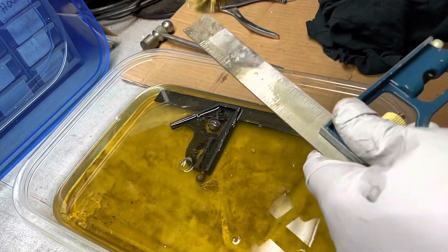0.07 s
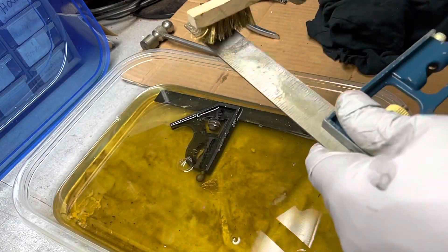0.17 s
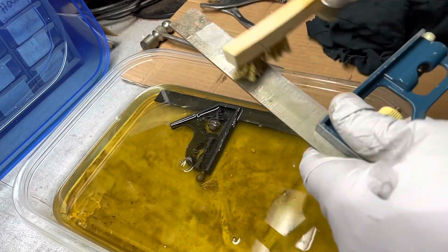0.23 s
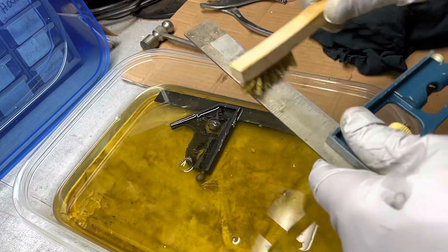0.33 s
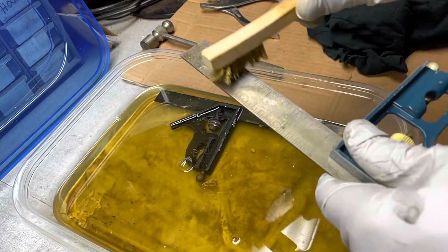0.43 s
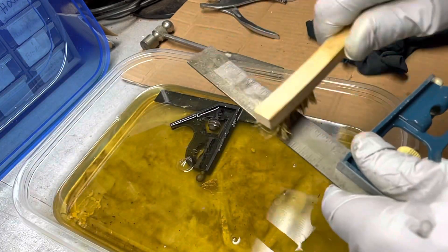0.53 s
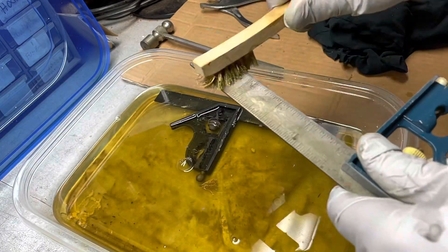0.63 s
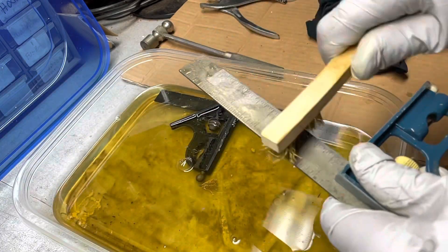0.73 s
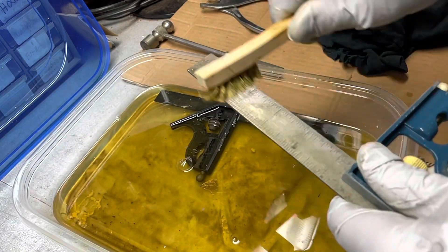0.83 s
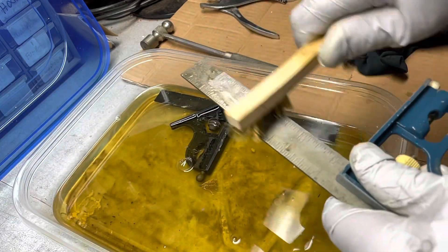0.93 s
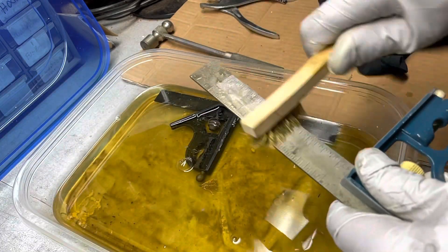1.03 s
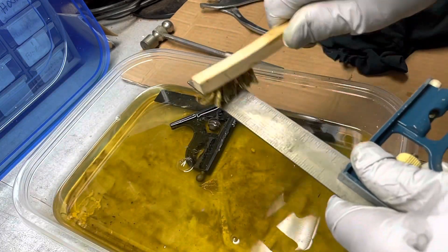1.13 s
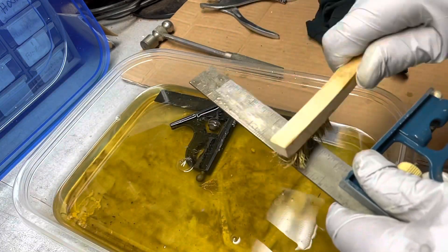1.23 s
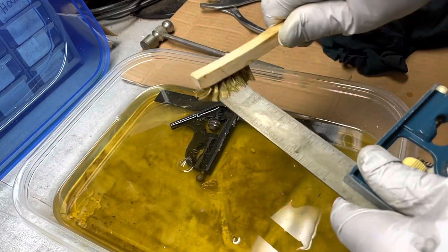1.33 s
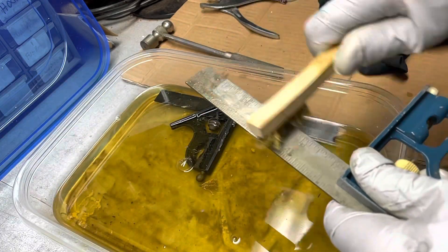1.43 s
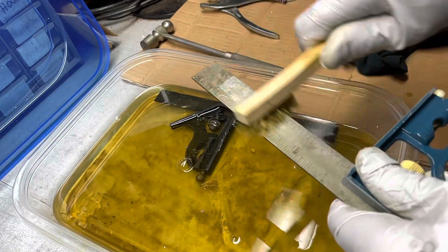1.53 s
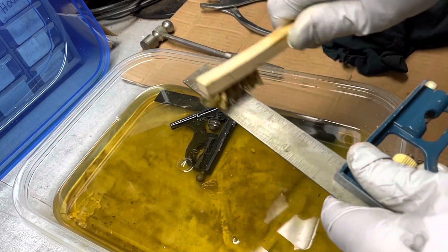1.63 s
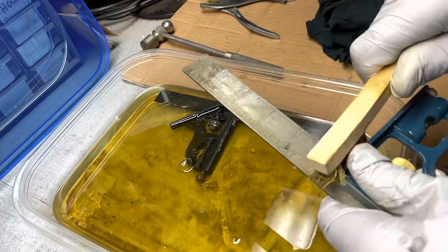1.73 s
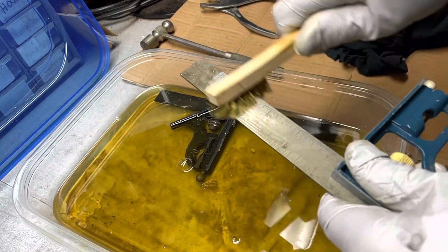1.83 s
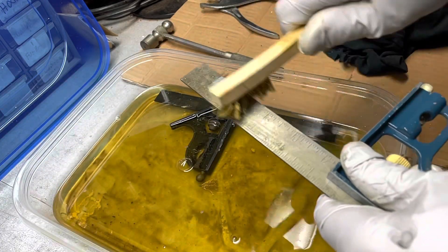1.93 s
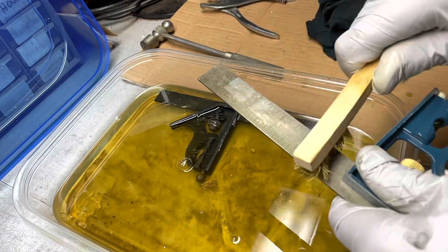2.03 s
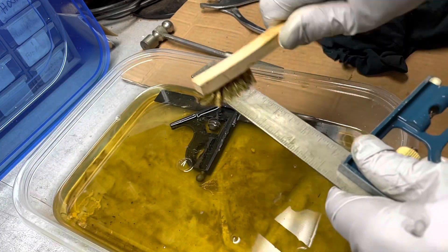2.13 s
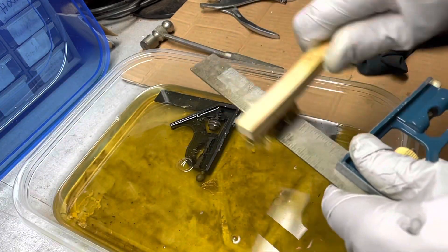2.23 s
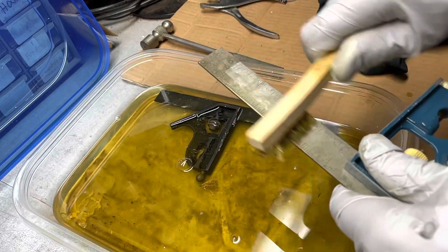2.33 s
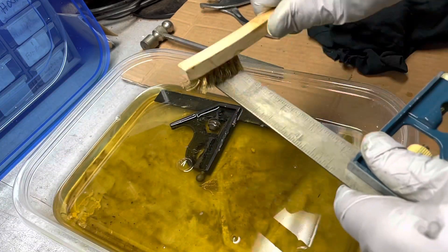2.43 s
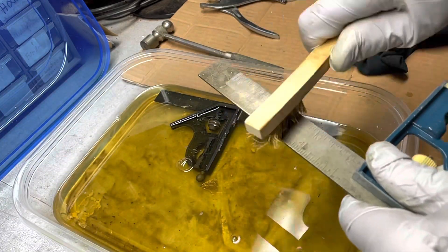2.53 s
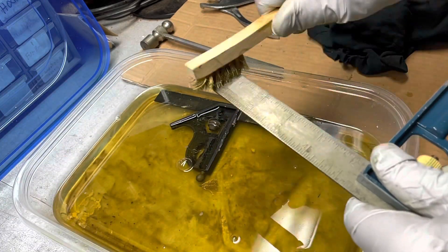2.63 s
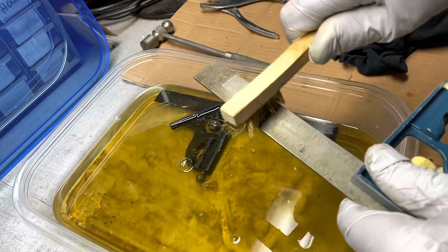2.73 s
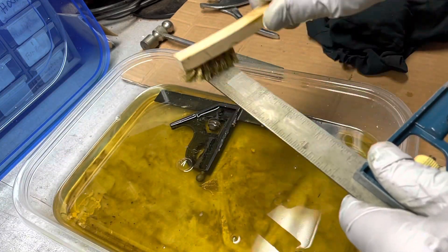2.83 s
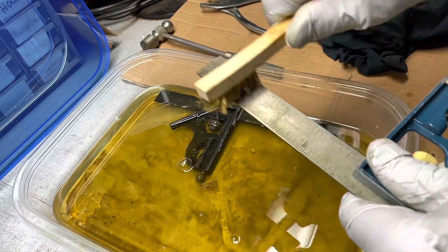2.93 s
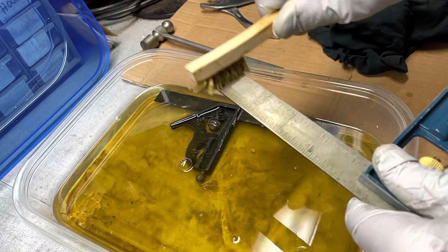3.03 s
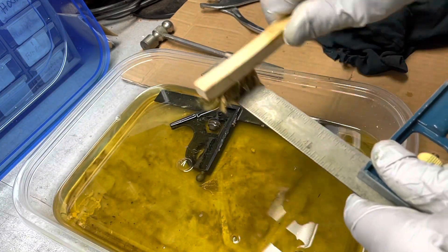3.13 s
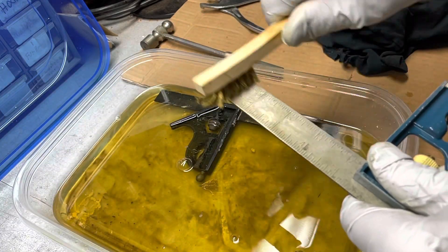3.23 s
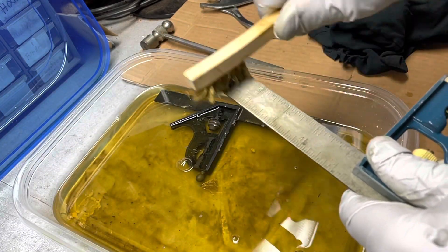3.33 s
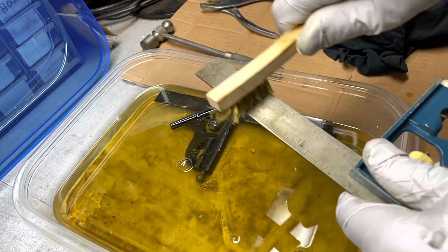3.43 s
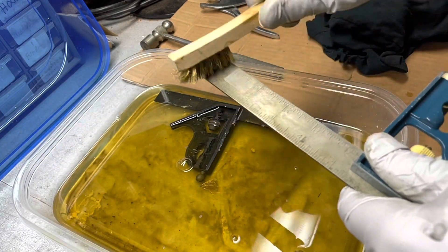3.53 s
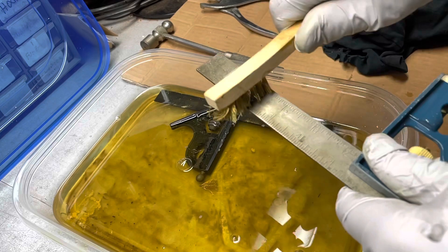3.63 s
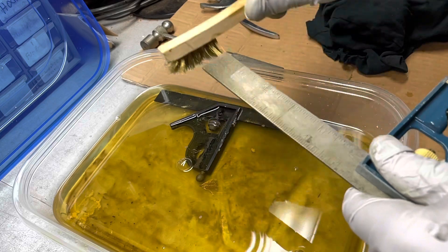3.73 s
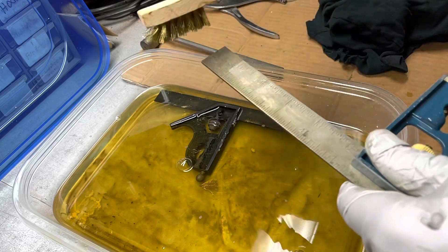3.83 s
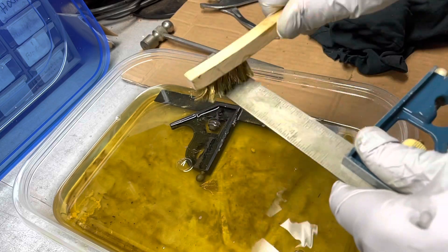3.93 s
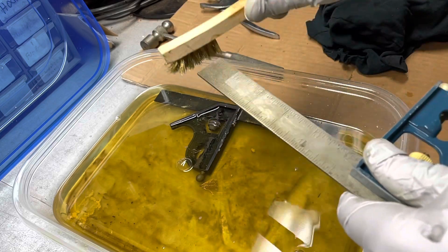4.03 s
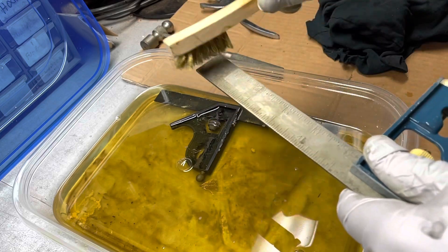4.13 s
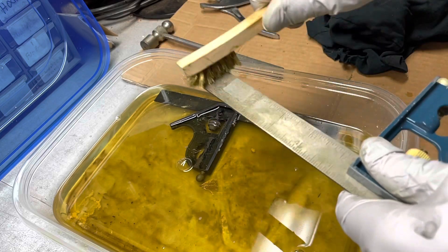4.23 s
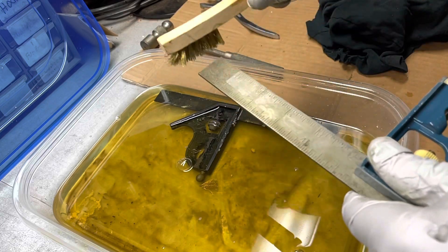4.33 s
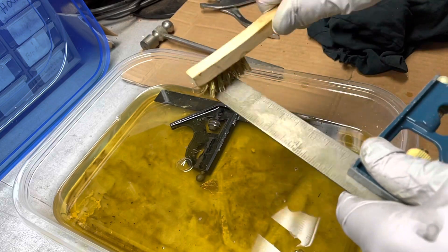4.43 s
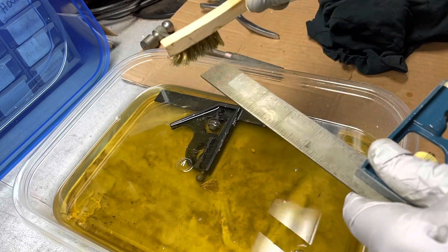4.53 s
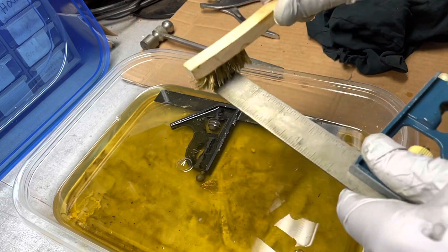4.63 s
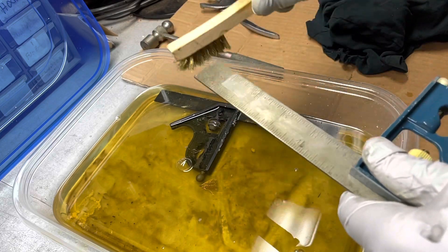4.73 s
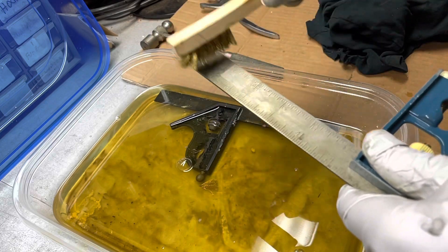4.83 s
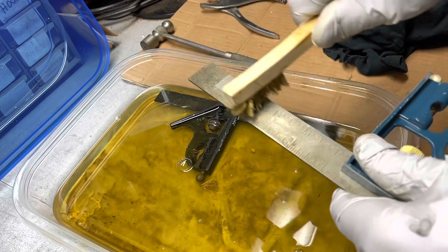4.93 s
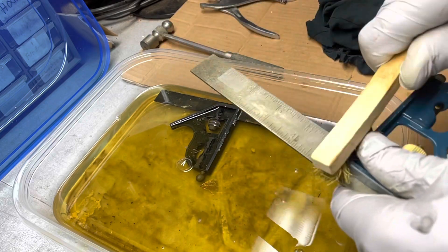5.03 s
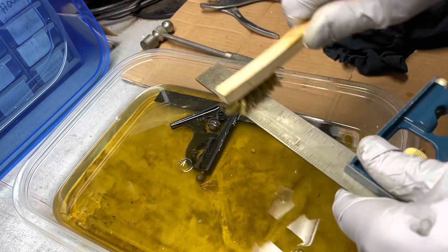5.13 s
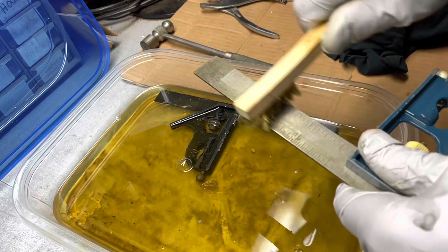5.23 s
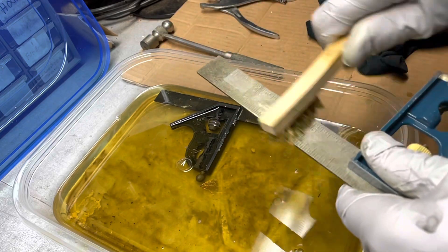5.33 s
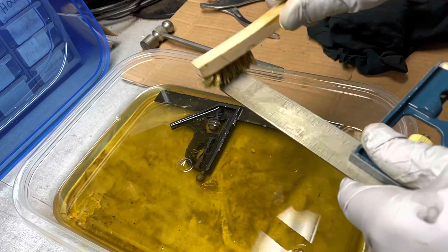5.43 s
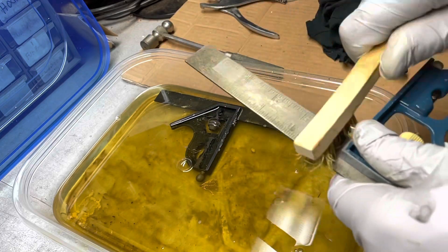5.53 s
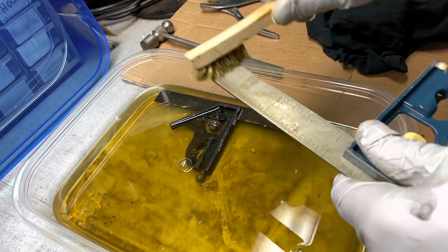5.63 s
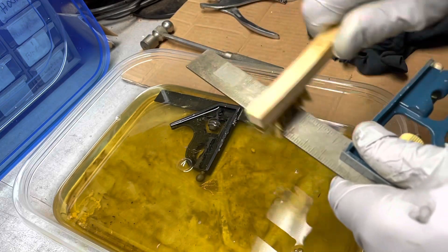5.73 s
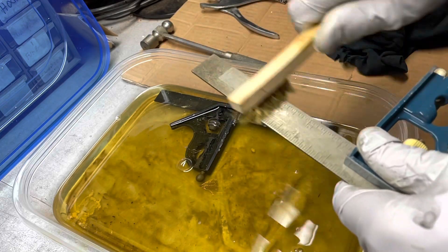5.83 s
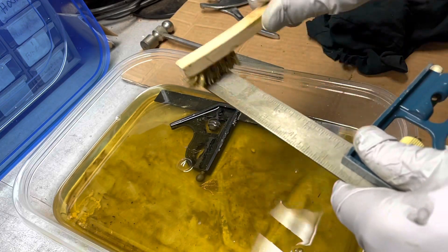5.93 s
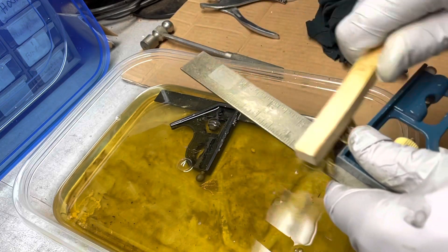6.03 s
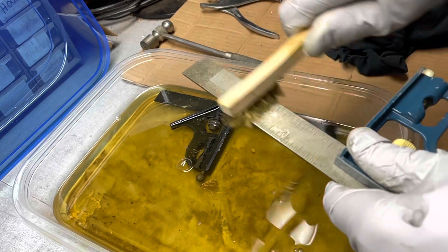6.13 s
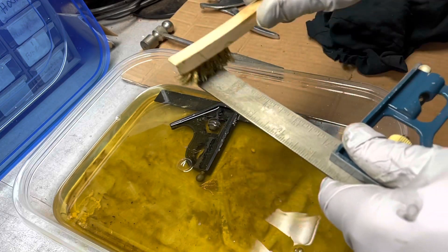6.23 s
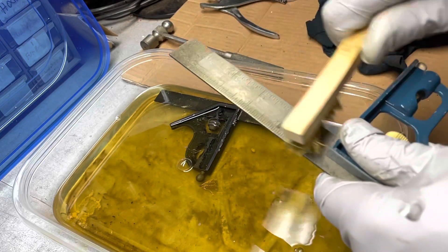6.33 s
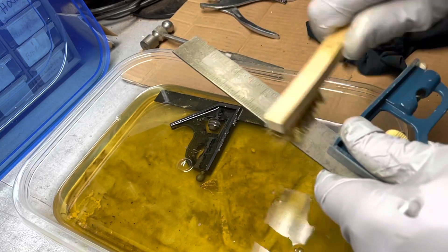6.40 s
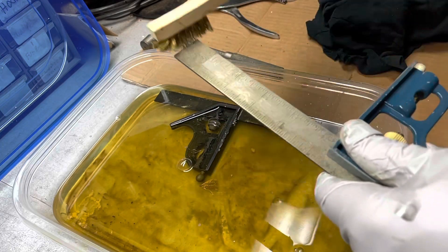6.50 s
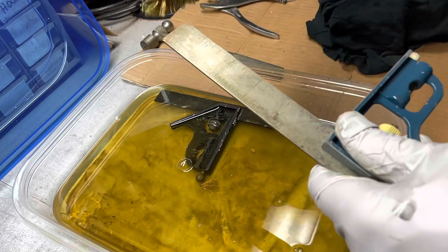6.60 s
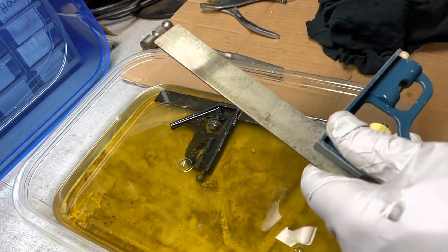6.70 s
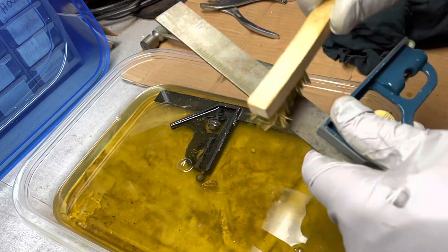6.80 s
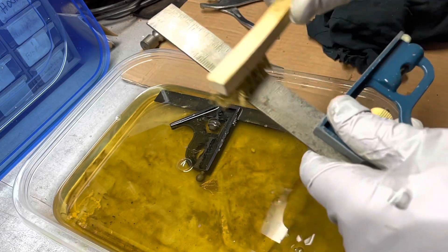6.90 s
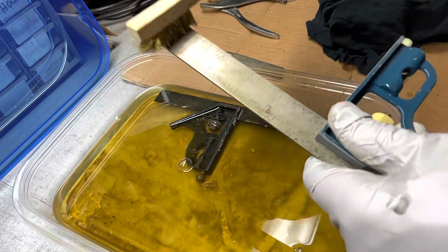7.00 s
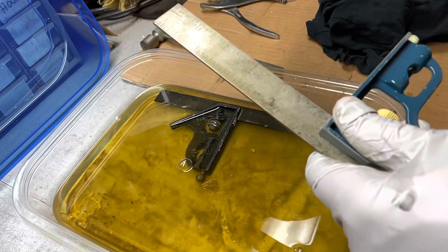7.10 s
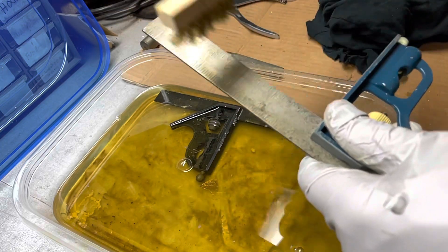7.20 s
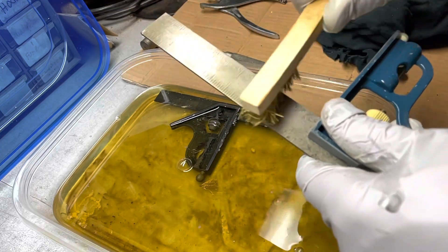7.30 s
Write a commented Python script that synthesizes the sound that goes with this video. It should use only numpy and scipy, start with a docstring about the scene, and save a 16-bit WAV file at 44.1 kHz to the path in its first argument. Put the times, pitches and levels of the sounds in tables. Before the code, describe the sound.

Close up in a quiet workshop, a wire brush taps down on a hand-held steel rule and scrubs fast, about eight strokes a second, gritty and bright with a thin metallic ring. After a brief break come five separate short scrapes, each landing with a light tick, then fast scrubbing resumes. It ends with two isolated strokes after pauses. A faint low wobble of the steel lies beneath. Stereo, nearly dry.

```python
"""A wire brush scrubs a hand-held steel rule back and forth, close by in a quiet workshop.
Thousands of bristle ticks a second make the steel ring; the brush slows at each turn, and lands with
a tap after a pause. The strokes and jolts of the brush set the free end wobbling at a low pitch.
Short echoes, steady air and one faint rustle, all made from noise, fill the background."""
import sys
import numpy as np
from scipy import signal
from scipy.fft import rfft, irfft, next_fast_len
from scipy.io import wavfile
from scipy.ndimage import uniform_filter1d

SR = 44100
rng = np.random.default_rng(int(sys.argv[2]) if len(sys.argv) > 2 else 0)


def wrap_up_sound(samples):
    """Save the sound to the file named by the first command line argument, as 16-bit audio."""
    columns = np.atleast_2d(samples).T
    # keep every value between -1 and 1, then stretch to whole-number steps
    tamed = np.clip(columns, -1, 1)
    steps = np.round(tamed * 32767).astype(np.int16)
    wavfile.write(sys.argv[1], SR, steps)


N = 324576
SIZE = next_fast_len(N)
HZ = np.fft.rfftfreq(SIZE, 1 / SR)
TIME = np.arange(N) / SR

# brush strokes: [turn t/s, kind, level/dB once up to speed, level/dB before it slows]
STROKES = [(.173, "first", -42.5, -35.5), (0.305, "pull", -40, -43.5), (.426, "push", -39, -37.5),
           (.536, "pull", -39, -40.5), (.655, "push", -37, -36.5), (0.771, "pull", -36, -38),
           (.886, "push", -34.5, -35), (1.01, "pull", -36, -41), (1.131, "push", -35.5, -37.5),
           (1.253, "pull", -35.5, -41.5), (1.375, "push", -34.5, -36.5), (1.503, "pull", -35, -41),
           (1.625, "push", -35.5, -35), (1.761, "pull", -36.5, -40), (1.908, "push", -37, -38.5),
           (2.054, "quick", -36.5, -38.5), (2.183, "push", -35.5, -35), (2.315, "pull", -38.5, -45),
           (2.45, "push", -37.5, -37), (2.559, "quick", -37.5, -40), (2.67, "push", -37, -38.5),
           (2.775, "quick", -38.5, -42.5), (2.888, "push", -35.5, -37), (2.995, "pull", -41.5, -41),
           (3.104, "push", -36, -37), (3.21, "pull", -39.5, -43.5), (3.315, "push", -35.5, -39.5),
           (3.43, "pull", -42.5, -43.5), (3.538, "push", -38, -40), (3.64, "pull", -43.5, -41.5),
           (3.943, "first", -44.5, -39.5), (4.204, "first", -43, -38), (4.419, "first", -46, -35.5),
           (4.646, "first", -45.5, -36.5), (4.882, "first", -39.5, -38.5), (4.967, "quick", -36.5, -39),
           (5.066, "push", -36.5, -42.5), (5.201, "push", -37, -36), (5.321, "pull", -38, -41.5),
           (5.438, "push", -35, -33), (5.559, "quick", -35.5, -41), (5.679, "push", -34.5, -37.5),
           (5.803, "quick", -38, -41.5), (5.938, "push", -36.5, -35.5), (6.085, "pull", -37, -44.5),
           (6.237, "push", -40, -36), (6.385, "pull", -37.5, -38.5), (6.506, "quick", -39, -54),
           (6.85, "first", -44, -41), (7.305, "first", -47, -43.5)]
# what strokes of one kind share: kind -> [slowing before the turn t/s, speeding up t/s,
#  level/dB at the turn, then favour level/dB for upper steel, middle steel, low steel, thud]
# first = after a landing, quick = a pull that hardly pauses at the turn
STROKE_KINDS = {"push": (0.0228, .034, -55, 3, -1, 3.5, 4), "pull": (0.0128, .03, -49, 0, 1.5, 6.5, 1.5),
                "quick": (0.04, 0.0277, -44.5, -.5, 0, 4.5, 0.8),
                "first": (.02, 0.01, -52, 1.5, -2.5, 3, -.5)}
# the brush starts to leave the rule: [t/s]
LIFTS = [3.762, 4.051, 4.292, 4.51, 4.753, 6.552, 7.065]
LIFT_S, LIFT_DB = .027, -28  # the bristles let go: time, and drop in level by then
# tufts that catch and spring free: [t/s, level/dB]
SNAGS = [(0.463, -39), (0.684, -36), (.9085, -50), (.923, -37), (1.164, -42), (1.404, -45), (1.646, -38.5),
         (1.773, -34), (1.934, -45), (2.106, -38), (2.206, -40), (2.338, -41), (2.485, -46), (2.699, -41),
         (3.02, -40), (3.238, -43), (3.449, -42), (3.74, -41), (5.081, -45), (5.225, -39), (5.342, -39),
         (5.458, -44), (5.69, -46), (5.703, -41), (6.26, -44), (6.876, -41), (7.22, -77)]
# the brush comes down on the rule: [t/s, bristle level/dB, thud level/dB, ring level/dB,
#  settling by 60 dB t/s, lead-in level/dB, lowest f/Hz rung: near the tip only upper modes answer]
LANDINGS = [(.128, -30.5, -42.5, -16.5, 0.074, -20, 168), (3.931, -32, -72, -11.5, 0.027, -38, 900),
            (4.192, -33.5, -60, -36, 0.029, -30, 900), (4.403, -38.5, -75, -36, 0.049, -35, 900),
            (4.638, -42.5, -86, -46, 0.035, -38, 900), (4.87, -39, -75, -23, 0.052, -46, 150),
            (6.82, -36.5, -47, -19, 0.079, -29, 500), (7.286, -33, -52, -8, 0.036, -26, 140)]
# colour of one bristle tick: [f/Hz, relative level/dB]
TICK_COLOUR = [(100, -26.5), (1600, -16), (2500, -12.5), (3100, -3), (3600, -4), (5200, -4), (5600, -6.5),
               (6100, -3), (7400, -7), (8300, -1), (10000, 5.5), (11200, 1.5), (13300, 5.5), (15700, 0)]
TICKS_PER_S, TICK_SPREAD_DB = 14000, 1.3
# random level changes: in quick clumps, in short patches, in slow drift
CLUMP_DB, PATCH_DB, DRIFT_DB = 0.75, 2.5, 2
TOGETHER = 0.22  # share of tick power that all pitch ranges have in common
# bristles of unlike length and tilt sound in these ranges: [edge f/Hz]
RANGE_EDGES = [20, 500, 1600, 2600, 3300, 4000, 4800, 5600, 6800, 8000, 9500, 11000, 12500, 14000, 30000]
# how far each range follows the dip as the brush slows, the top being 1:
#  [share for thud, low steel, middle steel, upper steel]
DIP_SHARES = [.85, .8, 1, 0.87]
# drift as the brush works another part of the rule:
#  [t/s, level/dB of thud, low steel, middle steel, upper steel]
PLACES = [(0, 0, -0.5, -0.19, 1), (1, 1, 1, 0.11, 0.5), (1.8, 0.5, 1, -0.079, -1), (2.3, 3, 1, 1, 2),
          (2.6, -2, 0.5, 0.2, 0.5), (3.4, 1.5, 0, 0, 0.5), (4, 1.5, 1.5, -0.21, 0.5),
          (4.6, -1, -1.5, -1.1, -1.5), (5.1, -1, -0.5, 1, -0.5), (5.6, 2, 1.5, 0.088, 3),
          (6.3, -0.5, -1.5, -0.11, 1), (6.8, 2.5, -1, 0, -0.5), (7, -3, -5.5, 0, -1), (7.3, 4, 2, 1, 0.5)]
# ways the rule rings: [f/Hz, width f/Hz, level/dB over the tick colour]
RULE_MODES = [(175, 30, 3), (225, 40, 3), (290, 50, 2), (412, 30, 4), (610, 70, 2), (800, 120, 0),
              (1140, 55, 10), (2540, 150, 2), (3560, 60, 0), (3910, 150, 3), (4550, 100, 2), (4780, 120, 2),
              (5200, 120, 0), (6470, 300, 1), (8760, 200, 3)]
SLIP_DB, SLIP_T60 = -58, .13  # dull rattle as bristles slip off the edge: level, seconds to fall 60 dB
# bending of the free end between jolts: [t/s, level/dB]
WOBBLE_LEVEL = [(0, -80), (.3, -70), (.9, -67), (1.3, -65.5), (2.1, -66.5), (2.3, -77), (2.9, -72),
                (3.3, -71), (3.7, -68), (3.88, -83), (4, -68.5), (4.45, -71), (4.8, -80), (5, -74),
                (5.5, -69.5), (6.4, -66.5), (6.9, -74.5), (7.36, -69)]
WOBBLE_HZ, WOBBLE_WIDTH_HZ = 59.8, 26  # pitch and width of a resonance that is applied twice
# jolts that set the free end swinging: [peak t/s, level/dB, time to fall 30 dB t/s]
JOLTS = [(0.158, -62, .05), (0.406, -66, .05), (0.552, -67, 0.091), (.8, -66, 0.058), (1.17, -61, .08),
         (1.31, -60, 0.043), (1.41, -65, 0.04), (1.797, -64, 0.051), (2.612, -68, 0.041), (3.036, -61, .08),
         (3.48, -61, 0.046), (3.959, -50.5, 0.057), (4.22, -54, .065), (4.532, -66, 0.049),
         (4.67, -63, 0.06), (4.898, -60.5, .05), (5.077, -62, 0.063), (5.617, -65, .06), (6.07, -50, 0.21),
         (6.843, -53, .09), (7.3, -62, .07)]
JOLT_RISE = 0.45  # build-up time as a share of the fall time
ROOM_DB, ROOM_T60 = -22, .3  # tail level, seconds to fall 60 dB
# workshop air: [f/Hz, relative level/dB]
AIR_COLOUR = [(59, -22), (100, -3), (140, -15), (752, -25.5), (4470, -29), (5530, -29.5), (6700, -29),
              (8640, -39.5), (13200, -31), (16000, -50)]
AIR_DB = -76  # level of each of two parts, before they are mixed
# faint rustle in the long pause: [t/s, level/dB]
RUSTLE_LEVEL = [(6.54, -100), (6.58, -75.5), (6.72, -74), (6.79, -79), (6.83, -100)]
# tone of the rustle: [f/Hz, relative level/dB]
RUSTLE_COLOUR = [(350, -44), (600, -7), (1610, -34), (1980, -0.5), (2090, -9), (7620, -17), (9360, -13),
                 (16000, -23)]
# the two microphone ports: [f/Hz, likeness 0-1, phase/radians, left minus right level/dB]
PORTS = [(100, .5, 0, -1.1), (1150, .7, -1.6, .1), (1650, .1, -1, 3), (2300, .5, -.9, -1),
         (3050, .7, -3, .8), (4200, .25, -1.2, 3), (5400, .4, -3, 4), (6400, .6, -5.1, .4),
         (7400, .1, -5.8, .5), (8300, .88, -3.4, -.3), (9150, .995, -3.14, -.1), (9500, .99, -3.12, -.1),
         (11200, .66, -1.8, .4), (12900, .97, -.1, 0), (13500, 1, 0, 0)]
EDGE_HZ = 15700


def brush():
    """Bristle ticks in clumps, coloured and rung by the rule; each pitch range flares in its own patches."""
    sweep_db, dip_db = sweep()
    contact = gain_of(sweep_db) + bursts([(s, db, .04, -30) for s, db in SNAGS])
    # the longest bristles touch first
    contact = contact + bursts([(s, db, t60, lead_db) for s, db, _, _, t60, lead_db, _ in LANDINGS])
    contact = contact * gain_of(CLUMP_DB * wander(.004))
    colour = gain_of(read(*np.transpose(TICK_COLOUR))) * ringing()
    colour /= np.sqrt(np.mean(abs(colour) ** 2))
    tints = range_tints(dip_db)
    broad = ticks()
    spectrum = 0
    for low, high in zip(RANGE_EDGES, RANGE_EDGES[1:]):
        favour_db = tints[np.searchsorted([1600, 2600, 4800, 8000], high)]
        # short patches, and a slower drift as the brush travels along the rule
        level_db = favour_db + PATCH_DB * wander(.012) + DRIFT_DB * wander(.06)
        # the same ticks, shifted in time, serve as separate ones
        own = np.roll(broad, rng.integers(N), axis=1)
        force = np.sqrt(TOGETHER) * broad + np.sqrt(1 - TOGETHER) * own
        band = np.sqrt(abs(above(low) - above(high)))
        spectrum = spectrum + rfft(force * contact * gain_of(level_db), SIZE) * band
    return irfft(spectrum * colour, SIZE)[:, :N]


def sweep():
    """Contact level and the dip from slowing, in dB: up from each turn, gone while the brush is lifted."""
    points = [(STROKES[0][0] - .02, -90, 0)]  # time, level, dip
    next_strokes = STROKES[1:] + [(N / SR, "pull")]
    for (s, kind, first_db, last_db), (after, next_kind, *_) in zip(STROKES, next_strokes):
        rise, turn_db = STROKE_KINDS[kind][1:3]
        points += [(s, turn_db, turn_db - first_db), (s + rise, first_db, 0)]
        lifts = [at for at in LIFTS if s < at < after]
        if lifts:
            lift = lifts[0]
            points += [(lift, last_db, 0), (lift + LIFT_S, last_db + LIFT_DB, 0)]
            points += [(lift + 2 * LIFT_S, -90, 0), (after - .02, -90, 0)]
        else:
            points.append((after - STROKE_KINDS[next_kind][0], last_db, 0))
    s, level_db, dip_db = np.transpose(points)
    return np.interp(TIME, s, level_db), np.interp(TIME, s, dip_db)


def range_tints(dip_db):
    """Stroke kind, place on the rule and slowing tint thud, low, middle and upper steel; the top stays 0 dB."""
    middles = np.array([row[0] for row in STROKES]) + 0.065
    # reversed, so that thud comes first
    favours = np.transpose([STROKE_KINDS[row[1]][:2:-1] for row in STROKES])
    place_s, *place_levels = np.transpose(PLACES)
    tints = []
    for favour, place, share in zip(favours, place_levels, DIP_SHARES):
        stroke_db = np.interp(TIME, middles, favour)
        place_db = np.interp(TIME, place_s, place)
        tints.append(stroke_db + place_db + (share - 1) * dip_db)
    return tints + [0]


def ticks():
    """Two trains of brief bristle hits at random moments, a few of them large."""
    size_db = TICK_SPREAD_DB * np.minimum(rng.exponential(1, (2, N)), 3.5)
    hits = rng.random((2, N)) < TICKS_PER_S / SR
    return evened(hits * rng.standard_normal((2, N)) * gain_of(size_db))


def ringing():
    """Response of the rule: the direct tick plus a damped mode at each resonance."""
    return 1 + sum(gain_of(db) * width / (width + 2j * (HZ - hz)) for hz, width, db in RULE_MODES)


def landings():
    """The weight of the brush: a dull rattle into the low modes, and one blow that leaves them ringing."""
    thuds = [(s, db, t60, -60) for s, _, db, _, t60, *_ in LANDINGS]
    slips = [(s - .01, SLIP_DB, SLIP_T60, -8) for s in LIFTS]
    rattle = bursts(thuds + slips) * rng.standard_normal((2, N))
    # the complex exponential places each blow at its time
    blows = sum(gain_of(db) * np.exp(-2j * np.pi * HZ * s) * above(hz)
                for s, _, _, db, _, _, hz in LANDINGS)
    dull = np.sqrt(1 - above(1200))
    ring = irfft(blows * dull * (ringing() - 1), SIZE)[:N]  # the ring without its direct tick
    return filtered(rattle, above(130) * dull * ringing()) + ring


def wobble():
    """Free end bending in its lowest mode, made as narrow noise that swells at jolts, nearly alike at both ports."""
    mode = (WOBBLE_WIDTH_HZ / (WOBBLE_WIDTH_HZ + 2j * (HZ - WOBBLE_HZ))) ** 2
    shared, apart = evened(filtered(rng.standard_normal((2, N)), mode))
    # partly evens out chance swells
    steady = np.sqrt(uniform_filter1d(shared ** 2, 3000) + 0.22)
    level = gain_of(np.interp(TIME, *np.transpose(WOBBLE_LEVEL)) + 3.0 * wander(0.054))
    for s, db, span in JOLTS:
        distance = np.maximum((s - TIME) / JOLT_RISE, TIME - s)
        level = np.maximum(level, gain_of(db - 30 * distance ** 2 / span ** 2))
    pair = shared / steady + 0.4 * np.outer([1, -1], apart)
    return level * pair * gain_of([[-.5], [.5]])  # a little softer on the left


def room(x):
    """Short diffuse tail from tray and bench; three random tails crossfade in regular turn to keep it smooth."""
    t = np.arange(SR // 3) / SR
    wet = 0
    for k in range(3):
        tail = rng.standard_normal((1, len(t))) * gain_of(-60 * t / ROOM_T60) * (t > .003)
        turn = np.cos(np.pi * (4 * TIME + k / 3)) * np.sqrt(2 / 3)
        wet = wet + signal.oaconvolve(x * turn, tail / np.linalg.norm(tail), axes=1)[:, :N]
    return gain_of(ROOM_DB) * wet


def hush():
    """Noise shaped into steady workshop air and a passing rustle, only partly alike at the two ports."""
    air = evened(filtered(rng.standard_normal((2, N)), gain_of(read(*np.transpose(AIR_COLOUR)))))
    rustle = evened(filtered(rng.standard_normal((2, N)), gain_of(read(*np.transpose(RUSTLE_COLOUR)))))
    rustle_gain = gain_of(np.interp(TIME, *np.transpose(RUSTLE_LEVEL)))
    middle, side = gain_of(AIR_DB) * air + rustle_gain * rustle
    return np.array([middle + .8 * side, middle - .8 * side])


def ports(pair):
    """Two unrelated signals become left and right with the likeness, phase and balance of the ports."""
    hz, same, phase, balance_db = np.transpose(PORTS)
    same = np.clip(read(hz, same), 0, 1)
    alike = filtered(pair[0], same * np.exp(1j * read(hz, phase)))
    right = alike + filtered(pair[1], np.sqrt(1 - same ** 2))
    half = gain_of(read(hz, balance_db) / 2)
    return filtered(np.array([pair[0], right]), np.array([half, 1 / half]))


def bursts(rows):
    """Loudness curve of bursts (s, dB, t60, lead-in dB): a faint lead-in, a 1.5 ms rise, then a decay."""
    out = np.zeros(N)
    for s, db, t60, lead_db in rows:
        t = np.arange(-.015, 1.5 * t60, 1 / SR)
        shape_db = np.interp(t, [-.015, -.001, .0005, t60 * 1.5], [lead_db - 25, lead_db, 0, -90])
        at = round((s - .015) * SR)
        out[at:at + len(t)] += gain_of(db + shape_db)[:N - at]
    return out


def wander(span):
    """Slow chance of rms about 1 that changes over about span seconds."""
    steps = np.arange(-1, N / SR / span + 2)
    # the factor makes up for the averaging between steps
    return np.interp(TIME / span, steps, rng.standard_normal(len(steps))) * np.sqrt(1.5)


def gain_of(db):
    """Decibels to gain."""
    return 10 ** (np.asarray(db) / 20)


def evened(x):
    """Scales to rms 1."""
    return x / np.sqrt(np.mean(x ** 2) + 1e-20)


def read(hz, value):
    """Reads a table at every FFT frequency, along a log pitch scale."""
    return np.interp(np.log(HZ + 1), np.log(hz), value)


def filtered(x, response):
    """Applies a frequency response."""
    return irfft(rfft(x, SIZE) * response, SIZE)[..., :N]


def above(hz):
    """Smooth step over frequency: near 0 below hz, near 1 above."""
    return 1 / (1 + (hz / (HZ + 1)) ** 12)


def scene():
    """Brush and rule in the room, heard through the ports, over wobble and hush."""
    near = brush() + landings()
    return ports(near + room(near)) + wobble() + hush()


def record(dry):
    """Takes away the treble above EDGE_HZ."""
    lowpass = signal.firwin(511, EDGE_HZ, window=("kaiser", 9), fs=SR)
    return signal.oaconvolve(dry, lowpass[None], "same")


dry = scene()
out = record(dry)
wrap_up_sound(out)
```